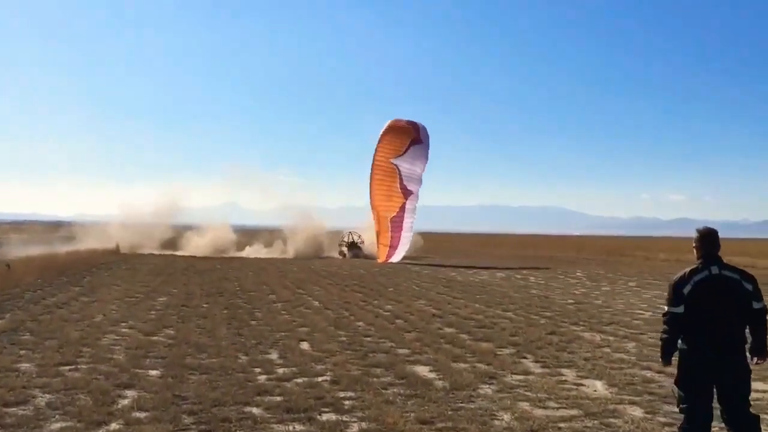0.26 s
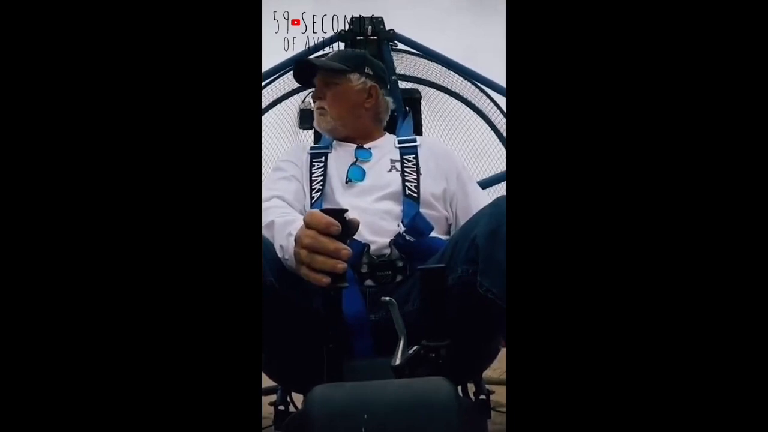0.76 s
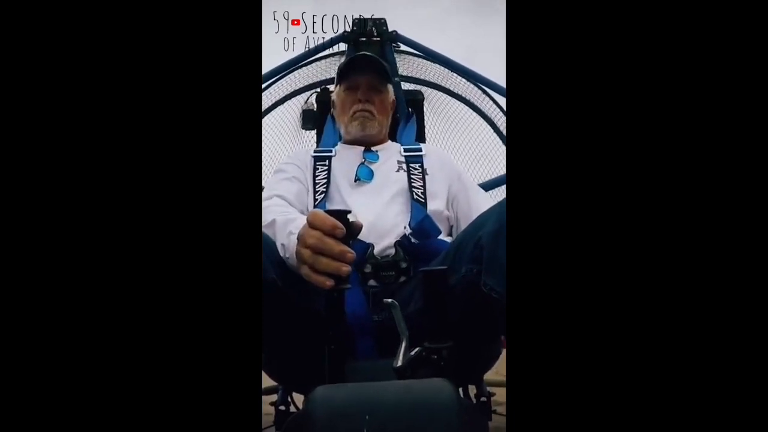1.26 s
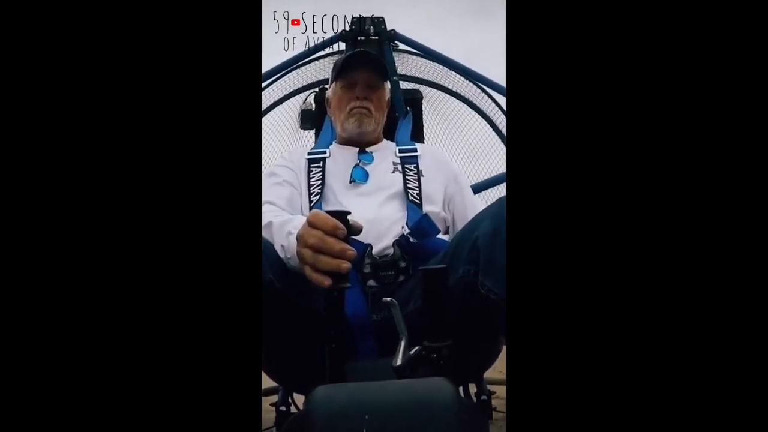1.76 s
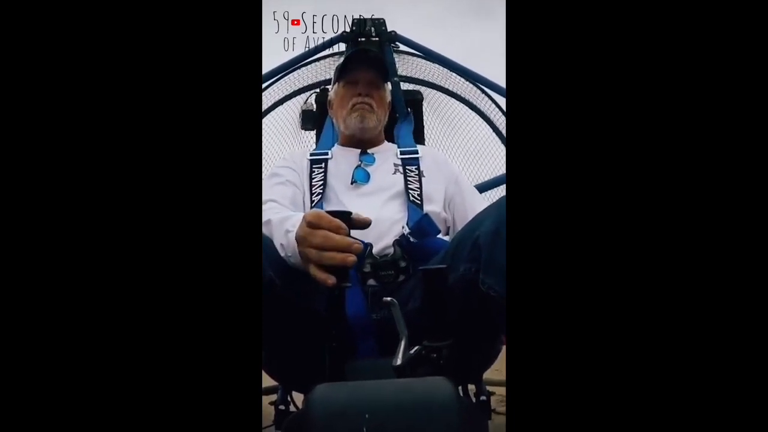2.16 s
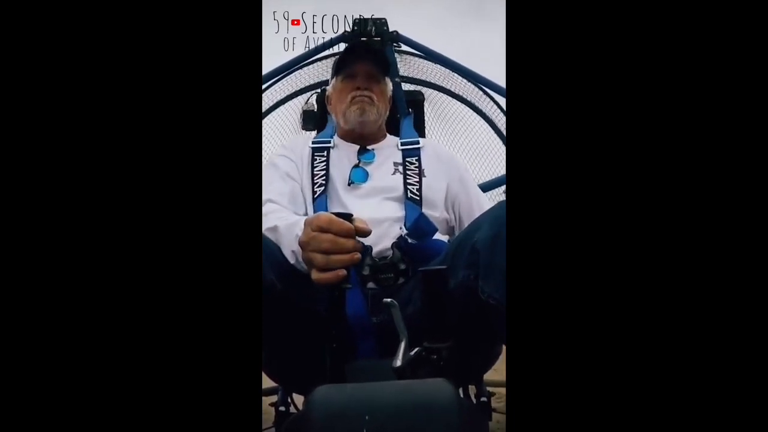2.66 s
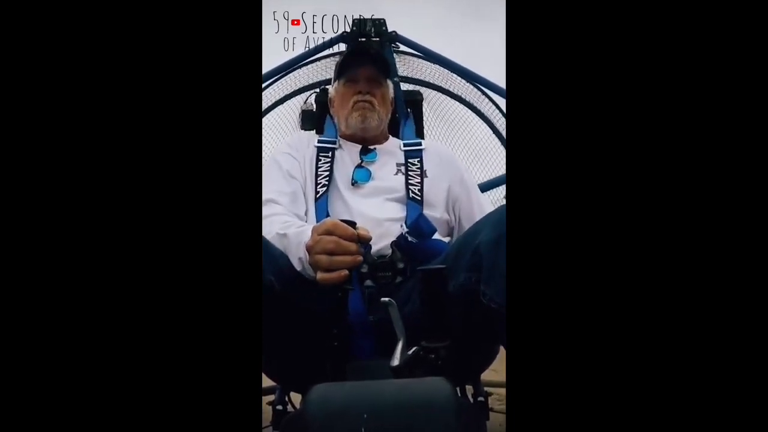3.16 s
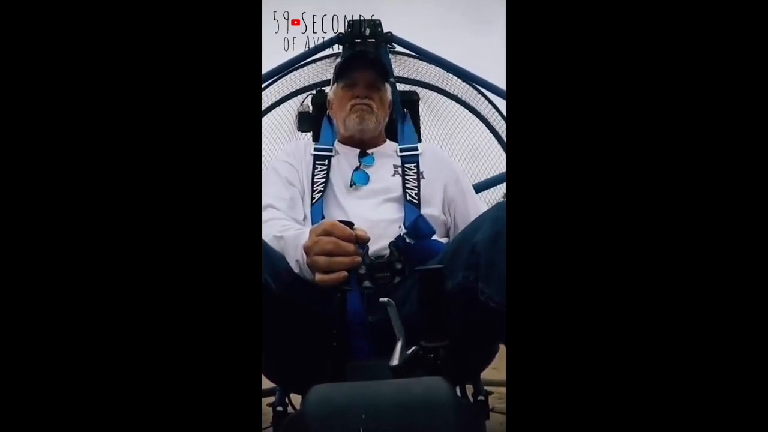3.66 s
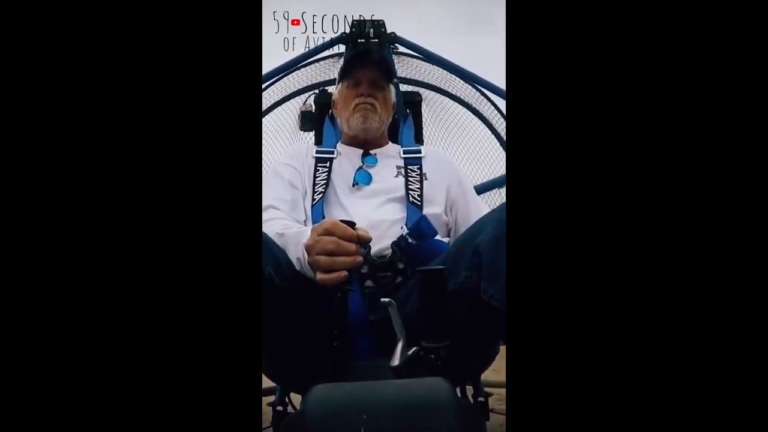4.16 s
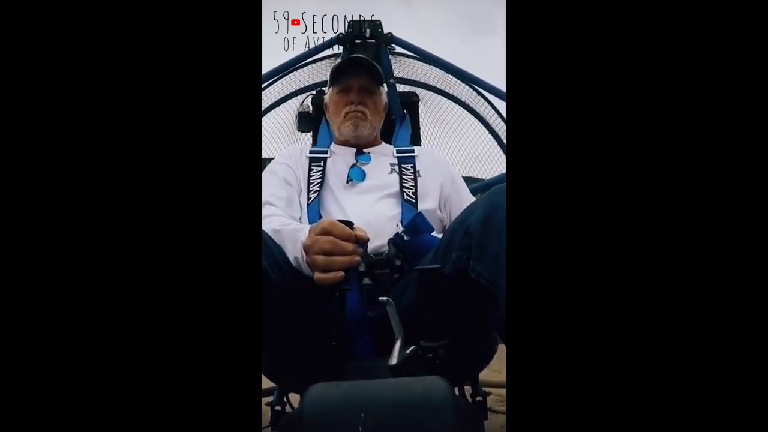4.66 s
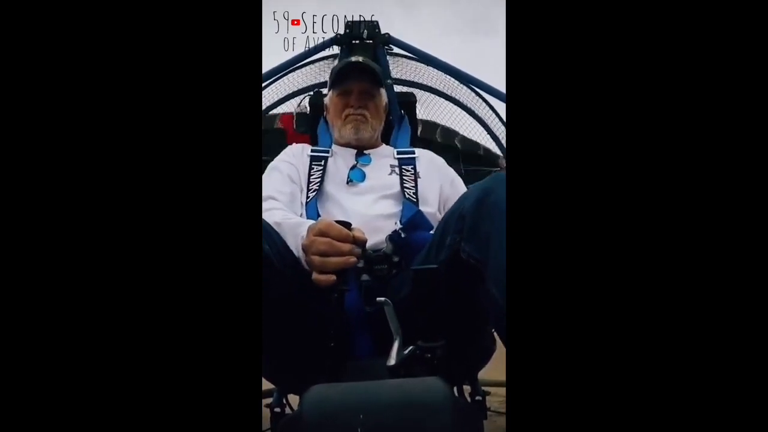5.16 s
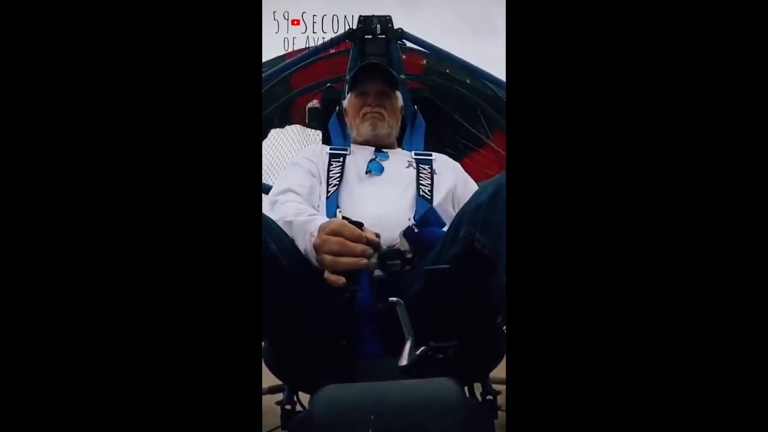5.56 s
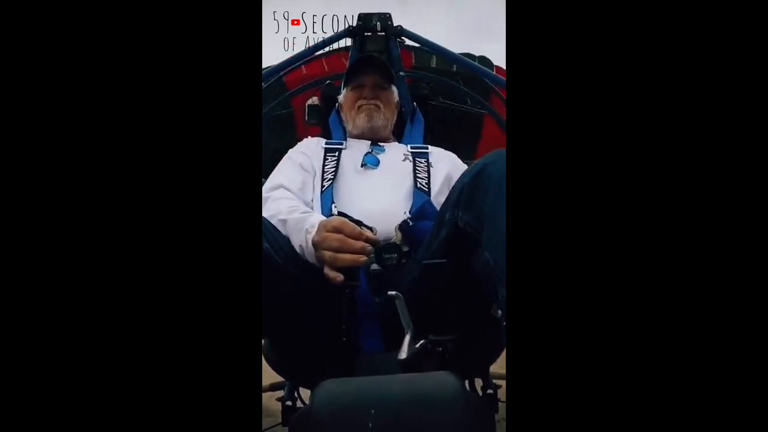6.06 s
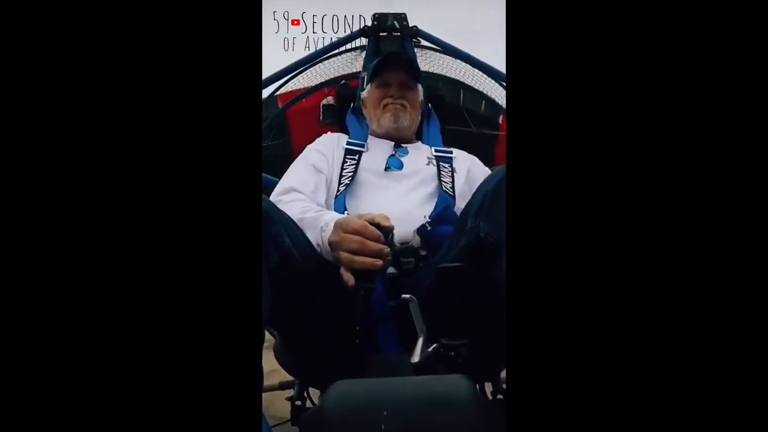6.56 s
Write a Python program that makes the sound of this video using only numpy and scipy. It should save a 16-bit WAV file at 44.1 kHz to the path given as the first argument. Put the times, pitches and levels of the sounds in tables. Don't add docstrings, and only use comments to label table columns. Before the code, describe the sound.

After a brief hushed outdoor moment with a far motor dying away, the sound jumps instantly to a close, loud engine and propeller. A low buzzing drone carries irregular blade throbs that sag and return, over buffeting, midrange roar and pulsing hiss. The engine pulls up a little, gaining a steady ringing hum, then holds; near the end the air grows slightly smoother. Outdoors, at the seat, limited and saturated microphone.

```python
import sys
import numpy as np
from scipy import signal
from scipy.fft import next_fast_len
from scipy.io import wavfile
from scipy.ndimage import uniform_filter1d

SR = 44100
rng = np.random.default_rng(int(sys.argv[2]) if len(sys.argv) > 2 else 0)


def unload_audio(sound):
    columns = np.transpose(np.atleast_2d(sound))
    steps = np.round(np.clip(columns, -1, 1) * 32767)
    wavfile.write(sys.argv[1], SR, steps.astype(np.int16))


def voltage_ratio(level):
    return 10 ** (np.asarray(level, float) / 20)


N = 299439
TIME = np.arange(N) / SR

GEAR, BLADES = 2.575, 3
# (t/s, f/Hz)
SPEED = [(0.43, 98.8), (1.35, 98.8), (1.7, 98.5), (2.25, 99.5), (2.75, 100.3), (3.15, 102.2), (3.5, 104.4),
         (4.05, 104.2), (5.55, 102.7), (6.3, 103.7), (6.79, 103.5)]
# (middle t/s, length/s, level/dB)
LULLS = [(0.753, 0.23, -9.5), (1.2, .2, -1.5), (1.57, 0.32, -13.5), (2.25, 0.17, -15), (2.834, 0.25, -10),
         (3.264, 0.11, -13), (4.252, 0.37, -7), (4.976, .22, -11), (5.225, 0.033, -6), (5.5, 0.49, -8),
         (6.35, 0.54, -7.5)]
# (middle t/s, length/s, level/dB)
SLACK = [
    (3.98, 0.24, -6),
    (6.33, .4, -12),
]


def curve(rows, column):
    rows = np.asarray(rows)
    return np.interp(TIME, rows[:, 0], rows[:, column])


def bells(rows):
    return sum(db * np.exp(-(2 * (TIME - middle) / length) ** 2) for middle, length, db in rows)


def blend(low_db, high_db, throttle):
    return low_db + throttle * (high_db - low_db)


def evened(x):
    return x / np.sqrt(np.mean(abs(x) ** 2) + 1e-20)


def drift(hz):
    rate = 500
    count = next_fast_len(N * rate // SR + 2)
    f = np.fft.fftfreq(count, 1 / rate)
    white = rng.standard_normal((count, 2)) @ [1, 1j]
    slow = np.fft.ifft(white / (1 + (f / hz) ** 2))
    return evened(np.interp(TIME * rate, np.arange(count), slow))


def noise(spectrum, patchy_db, size=1024):
    hz = np.fft.rfftfreq(size, 1 / SR)
    f, db = np.transpose(spectrum)
    shape_db = np.interp(np.log(hz + 1), np.log(f + 1), db, left=-120, right=-120)
    a, b, patches = rng.standard_normal((4 * N // size + 5, len(hz), 3)).T
    patches = uniform_filter1d(patches, size=10, axis=0)
    patches = evened(uniform_filter1d(patches, size=12, axis=1))
    z = (a + 1j * b) * voltage_ratio(shape_db[:, None] + patchy_db * patches)
    return evened(signal.istft(z, nperseg=size, noverlap=3 * size // 4)[1][:N])


def tone(turns, db, rough, wobble_hz):
    size = (1 + rough * drift(wobble_hz)) / np.sqrt(1 + rough ** 2)
    spin = np.exp(2j * np.pi * (turns + rng.random()))
    return np.sqrt(2) * voltage_ratio(db) * (size * spin).real


def pulling():
    pull = uniform_filter1d(np.gradient(curve(SPEED, column=1)) * SR, size=SR // 3)
    return np.tanh(np.maximum(pull, 0) / 3.2)


def rolling():
    return np.maximum(TIME - 5.63, 0)


def engine(crank, throttle):
    # (engine order, level at low throttle/dB, level at high throttle/dB)
    exhaust_orders = [(1, -18, -17), (2, -21.5, -32), (3, -26.5, -36.5), (4, -32.0, -19.0), (5, -31, -42.5),
                      (6, -46.5, -41.5), (7, -37.5, -56.5), (8, -35.5, -42), (9, -71, -49), (10, -60, -47),
                      (11, -45, -53), (12, -41.5, -41.5), (13, -43, -39.5), (14, -41, -41.5),
                      (15, -58.5, -46.5), (16, -57, -57), (17, -63, -48), (18, -36.5, -32.5),
                      (19, -30, -55), (20, -34.5, -47.5)]
    # (middle t/s, length/s, level/dB)
    rasps = [
        (1.75, 1.0, 5),
        (2.6, 0.68, 0.5),
        (4.9, 1.0, 2.5),
    ]
    rasp_from = 7
    firing_rise = .35
    out = tone(4 * crank, frame_db(), rough=.2, wobble_hz=4)
    for order, low_db, high_db in exhaust_orders:
        if order == 4:
            continue
        db = blend(low_db, high_db, throttle)
        rough, wobble_hz = .12 + .055 * order, 3 + .25 * order + .02 * order ** 2
        if order == 1:
            rough, wobble_hz = 1.2, 6
            db = db - firing_rise * bells(SLACK)
        if order >= rasp_from:
            db = db + bells(rasps)
        out += tone(order * crank, db, rough, wobble_hz)
    return out


def frame_db():
    sing_hz, sing_width_hz = 101.05, .4
    mute_db, sing_db, droop_db_per_hz = -30.5, -16.5, -1.26
    above_hz = curve(SPEED, column=1) - sing_hz
    caught = .5 + .5 * np.tanh(above_hz / sing_width_hz / 2)
    null_db = -10 * np.exp(-((above_hz + .65) / .35) ** 2)
    droop_db = droop_db_per_hz * np.maximum(above_hz - 1.5, 0)
    return mute_db + null_db + caught * (sing_db - mute_db + droop_db)


def propeller(crank, throttle):
    # (shaft order, level at low throttle/dB, level at high throttle/dB)
    shaft_orders = [(1, -38, -40), (2, -19, -19), (6, -34, -33.5), (9, -42.5, -33.5), (12, -38.5, -34.5),
                    (15, -62, -52.5), (18, -46, -65)]
    # (engine order, blade passes, level at low throttle/dB, level at high throttle/dB)
    mixed_orders = [
        (3, -1, -26.5, -34),
        (1, 0.95, -32, -33),
    ]
    sum_rise = 0.35
    shaft = crank / GEAR
    out = tone(BLADES * shaft, -10.5 + bells(LULLS), rough=0.38, wobble_hz=3.8)
    chop_db = chop(throttle)
    for order, low_db, high_db in shaft_orders:
        db = blend(low_db, high_db, throttle)
        if order < BLADES:
            db = db + bells(SLACK)
        if order == 2 * BLADES:
            db = db + 7.5 * pulling()
        if order > 2 * BLADES:
            db = db + chop_db
        out += tone(order * shaft, db, rough=.4 + .08 * order, wobble_hz=3 + .3 * order)
    for order, passes, low_db, high_db in mixed_orders:
        turns = order * crank + passes * BLADES * shaft
        db = blend(low_db, high_db, throttle) - (passes > 0) * sum_rise * bells(LULLS)
        out += tone(turns, db, rough=0.52, wobble_hz=10)
    return out


def chop(throttle):
    smooth_hz, smooth_width_hz = 100.9, 1.6
    even = np.exp(-((curve(SPEED, column=1) - smooth_hz) / smooth_width_hz) ** 2)
    return 3.5 + 2 * throttle - 15 * even - 5 * rolling()


def airflow(crank, throttle):
    # (f/Hz, level/dB per Hz)
    buffet_low = [(15, -20), (35, -20), (60, -12), (85, -9), (110, -2), (135, -6.5), (165, -9), (215, -10),
                  (260, -17), (400, -25.5), (470, -21.5), (545, -28), (800, -20), (960, -39.5)]
    # (f/Hz, level/dB per Hz)
    buffet_high = [(15, -39.5), (35, -15.5), (60, -10.5), (85, -2.5), (105, -5.5), (135, -4), (165, -17.5),
                   (260, -20.5), (350, -15.5), (420, -19), (480, -31.5), (560, -28.5), (830, -25),
                   (920, -29.5)]
    # (f/Hz, level/dB per Hz)
    roar_shape = [(700, -40), (900, -22.5), (980, -14.5), (1220, -6.5), (1330, -8), (1480, -6.5),
                  (1580, 0.5), (1750, -0.5), (1870, 0), (1980, -4.5), (2100, -8), (2350, -16), (2620, -27),
                  (2900, -41.5)]
    # (f/Hz, level/dB per Hz)
    hiss_shape = [(2300, -31), (2680, -14), (2850, -8.5), (3480, -4), (3770, -0.5), (4020, -5), (4530, 0.5),
                  (5060, -7), (5970, -6.5), (7760, -11.5), (8750, -18), (9300, -16.5), (9900, -23.5),
                  (10700, -25.5)]
    # (f/Hz, level/dB per Hz)
    fizz_shape = [(11500, -20), (12000, -3), (12800, 0), (13600, -1), (14400, -3), (15000, -20)]
    blade = 2 * np.pi * BLADES * crank / GEAR
    puff = np.cos(blade) + 0.15 * np.cos(2 * blade + 2.9) + 0.091 * np.cos(blade / BLADES)
    gusts, flutter = drift(2).real, drift(90).real

    low = noise(buffet_low, 2.8, size=4096)
    high = noise(buffet_high, 0.42, size=4096)
    mix = np.sqrt(1 - throttle) * low + np.sqrt(throttle) * high
    buffet = voltage_ratio(-16 + 0.49 * gusts + 0.091 * bells(SLACK)) * mix
    band = signal.butter(2, [440, 570], "band", fs=SR, output="sos")
    ripple = evened(signal.sosfilt(band, rng.standard_normal(N)))
    buffet += voltage_ratio(-41 + chop(throttle)) * ripple

    roar = evened(noise(roar_shape, 0.64) * voltage_ratio(0.23 * puff + 0.21 * gusts + 0.35 * flutter))
    pulse = voltage_ratio(1.55 * puff + 0.32 * gusts + 0.31 * flutter)
    hiss = evened(noise(hiss_shape, 0.81) * pulse)
    fizz = evened(noise(fizz_shape, 0.81) * pulse)

    roar_db = -22 + 0.071 * bells(LULLS) + 2 * pulling() - 2 * rolling()
    hiss_db = -30 + 1.5 * throttle + .1 * bells(LULLS) + 0.6 * pulling() - 0.9 * rolling()
    return buffet + voltage_ratio(roar_db) * roar + voltage_ratio(hiss_db) * hiss + gust_gain() * fizz


def gust_gain():
    # (start t/s, length/s, level at the end/dB)
    cross_gusts = [
        (.2, 2.07, -50.5),
        (4.0, 0.45, -56),
        (4.28, 0.83, -49.5),
        (4.997, 0.4, -53),
        (5.296, .88, -50),
        (6.4, .25, -53),
    ]
    rise_s, fall_s, growth_db = .2, .14, 4.5
    out = voltage_ratio(-62.5) * np.ones(N)
    for start, length, db in cross_gusts:
        fade_in = (TIME - start) / rise_s
        fade_out = (start + length - TIME) / fall_s
        edge = np.clip(np.minimum(fade_in, fade_out), 0, 1)
        remaining = np.clip(1 - (TIME - start) / length, 0, 1)
        out += edge * voltage_ratio(db - growth_db * remaining)
    return out


def seat_camera(x):
    power = uniform_filter1d(uniform_filter1d(x ** 2, size=600), size=400)
    power_db = 10 * np.log10(power + 1e-9)
    over_db = uniform_filter1d(np.maximum(power_db + 10.0, 0), size=300)
    limited = x / voltage_ratio(.45 * over_db)
    ceiling = 1.25
    return thinned(limited / (1 + (limited / ceiling) ** 4) ** .25)


def thinned(x):
    # (f/Hz, level/dB)
    treble_floor = [(8200, -90), (8500, -69), (9600, -69), (10600, -71), (10700, -50), (11900, -50),
                    (12000, -72), (14500, -72), (14600, -50)]
    longer = np.pad(x, (0, 2048), "reflect", reflect_type="odd")
    hz, _, z = signal.stft(longer, SR, window="cosine", nperseg=2048, noverlap=1024)
    f, db = np.transpose(treble_floor)
    strength = np.sqrt(uniform_filter1d(abs(z) ** 2, size=3, axis=0))
    z[strength < voltage_ratio(np.interp(hz, f, db, left=-200))[:, None]] = 0
    return signal.istft(z, SR, window="cosine", nperseg=2048, noverlap=1024)[1][:N]


def field():
    # (f/Hz, level/dB per Hz)
    far_shape = [(25, -8.5), (230, -4.5), (320, -7), (800, -19), (2100, -20), (2850, -35.5), (3400, -24.5),
                 (4300, -31), (5000, -43), (6000, -32), (7300, -47), (8500, -41), (10500, -51),
                 (15400, -63.5)]
    # (t/s, level/dB)
    far_fade = [
        (0.0, -33.5),
        (0.15, -39),
        (0.406, -41.5),
        (0.41, -40),
    ]
    # (f/Hz, level/dB per Hz)
    breeze_shape = [(20, -1), (45, -2), (100, -4), (160, -14)]
    far = voltage_ratio(curve(far_fade, column=1)) * noise(far_shape, 1.4, size=2048)
    return far + voltage_ratio(-47.5) * noise(breeze_shape, 2.5, size=4096)


def scene():
    cut_s, splice_s = .4277, .0001
    cruise_hz, climb_hz = 97.96, 103.23
    crank_hz = curve(SPEED, column=1)
    hunt_hz = .12 * drift(2.94).real
    crank = np.cumsum(crank_hz + hunt_hz) / SR
    throttle = np.clip((crank_hz - cruise_hz) / (climb_hz - cruise_hz), 0, 1)
    seat = engine(crank, throttle) + propeller(crank, throttle) + airflow(crank, throttle)
    after = np.clip((TIME - cut_s) / splice_s, 0, 1)
    return ((1 - after) * field() + after * seat_camera(seat))[None]


def band_limit(x):
    return signal.sosfilt(signal.butter(12, 15250, fs=SR, output="sos"), x)


def record(dry):
    fade = np.clip((TIME[-1] - TIME) / .003, 0, 1)
    return band_limit(dry * fade)


dry = scene()
out = record(dry)
unload_audio(out)
```